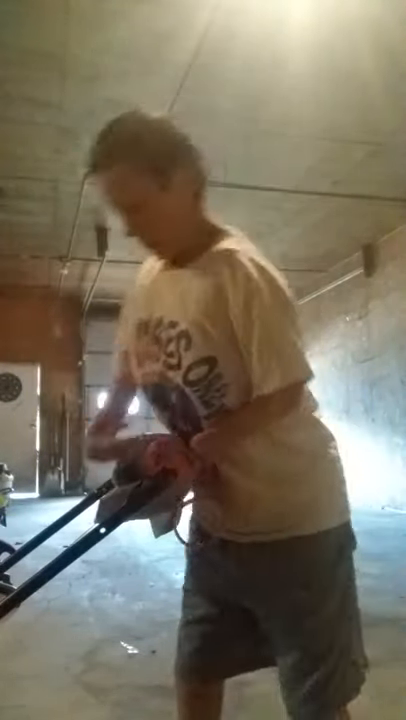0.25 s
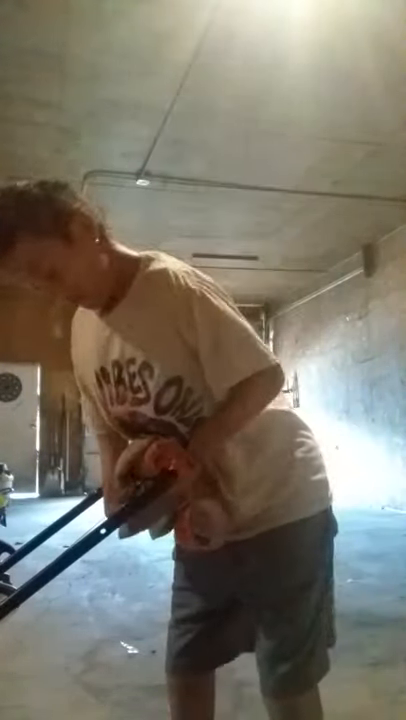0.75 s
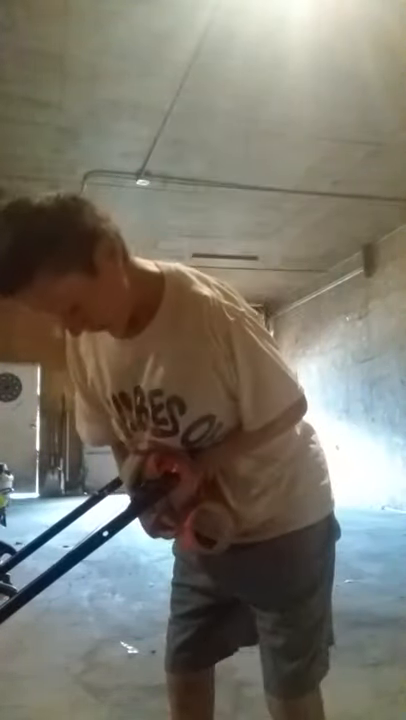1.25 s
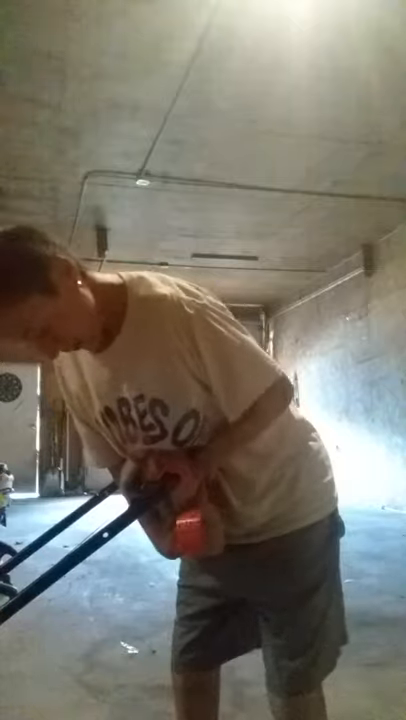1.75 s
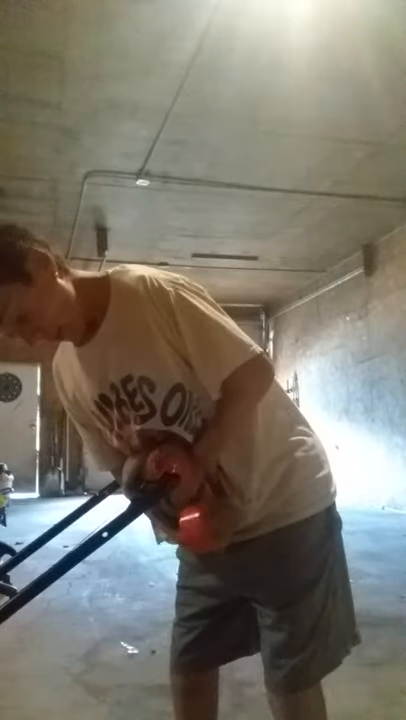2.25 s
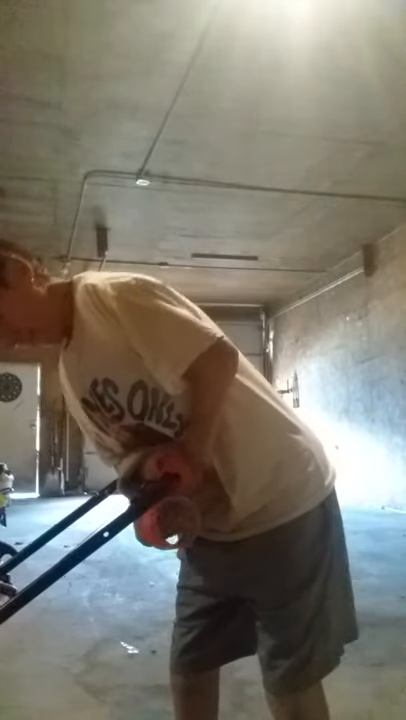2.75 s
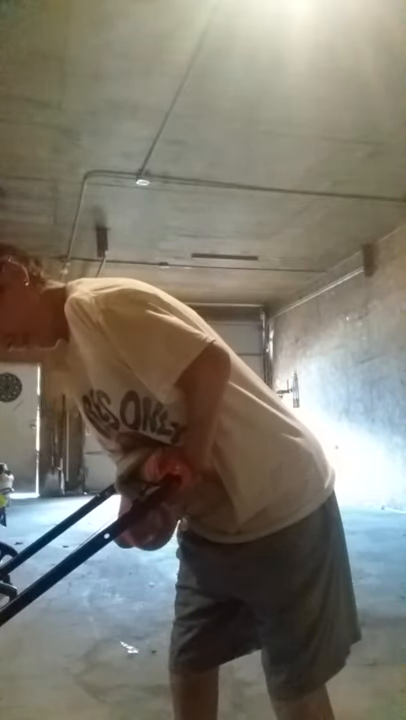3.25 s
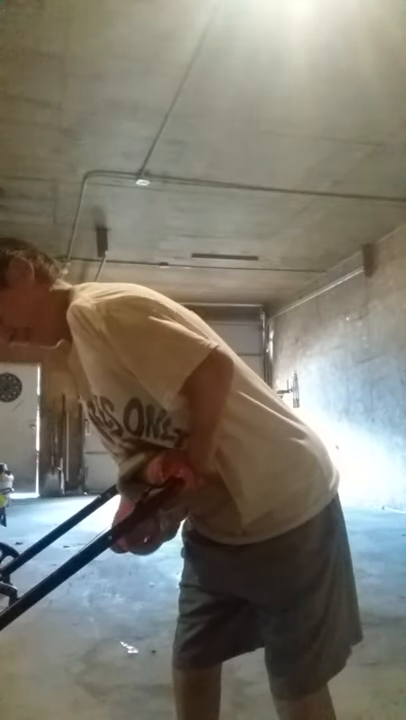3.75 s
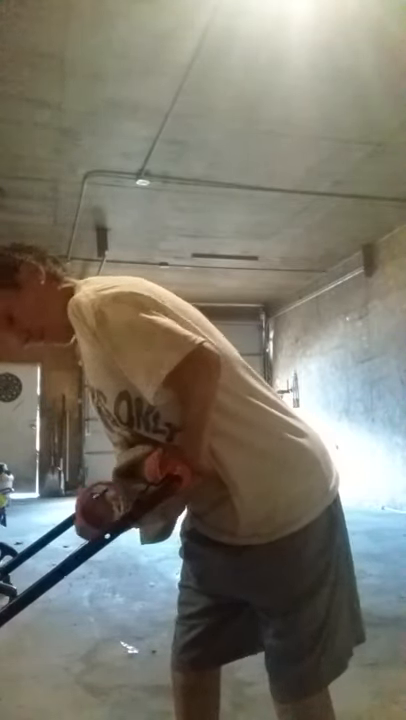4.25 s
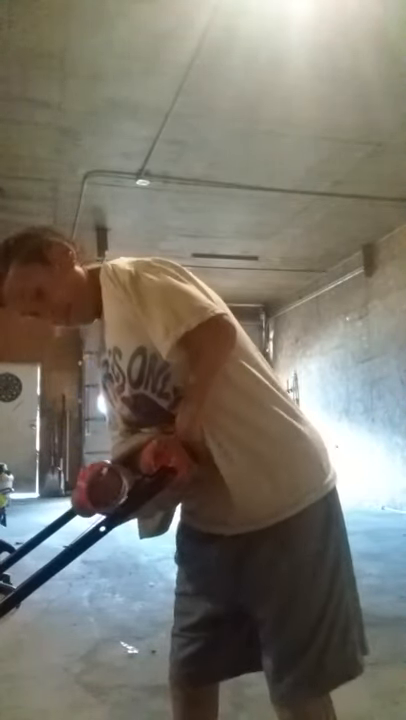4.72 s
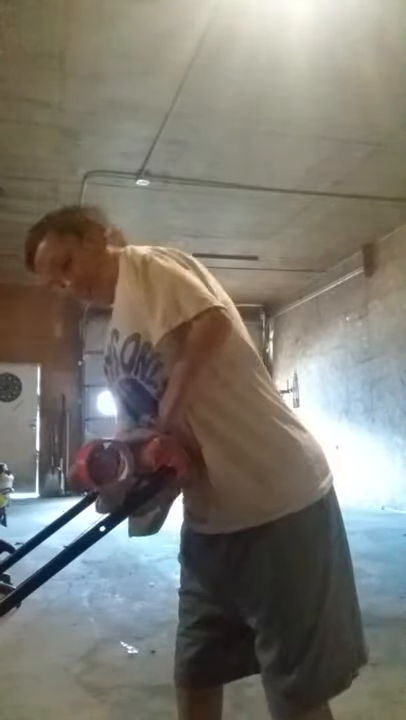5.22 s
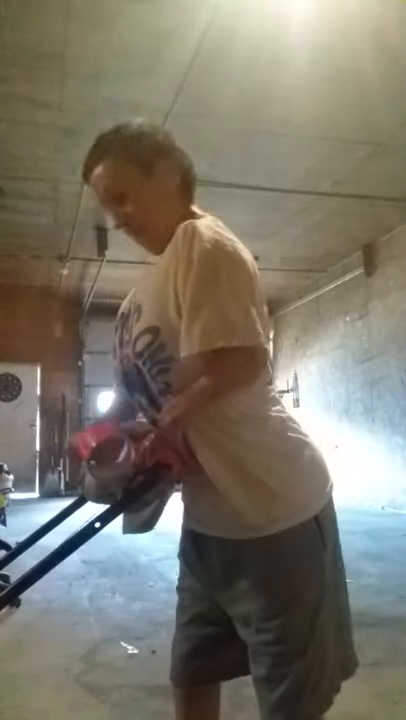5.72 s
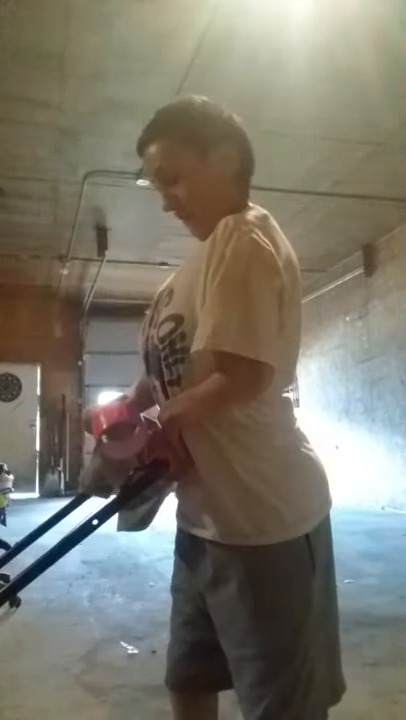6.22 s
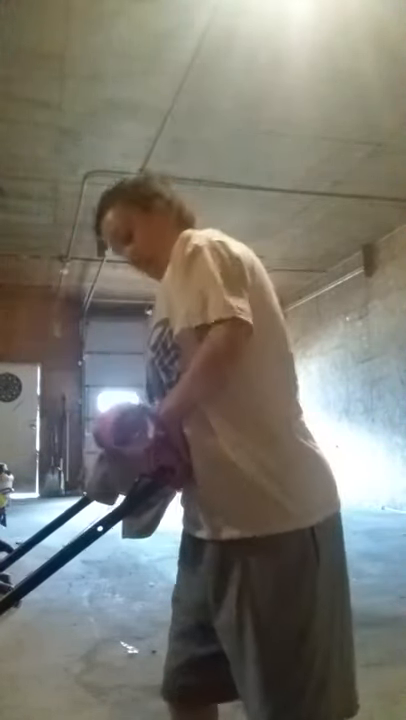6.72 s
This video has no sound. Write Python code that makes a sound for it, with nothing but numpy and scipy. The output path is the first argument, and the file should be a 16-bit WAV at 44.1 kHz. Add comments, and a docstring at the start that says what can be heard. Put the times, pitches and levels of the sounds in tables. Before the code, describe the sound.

Soft handling rustle, then brief sharp rips of sticky tape being wound around a tool handle in a bare concrete room.

```python
"""Duct tape is pulled off the roll in nine short rips and wound round a tool handle in a concrete garage.
Each rip is a run of stick-slip jerks: glue threads snap in clusters and ring the taut strip and the
cardboard roll. Between rips, hands and clothes rustle, the tape ticks and the roll bumps the handle.
A pair of microphones close to the hands hears the bare walls ring behind them, over a low hum."""
import sys
import numpy as np
from scipy import signal
from scipy.fft import rfft, irfft, next_fast_len
from scipy.io import wavfile
from scipy.ndimage import uniform_filter1d

SR = 44100
rng = np.random.default_rng(int(sys.argv[2]) if len(sys.argv) > 2 else 0)


def transcribe(signal):
    """Save signal, clipped to [-1, 1], as a 16-bit WAV file at the path in sys.argv[1]."""
    frames = np.atleast_2d(signal).T
    limited = np.clip(frames, -1, 1)
    pcm = np.round(limited * 32767).astype(np.int16)
    wavfile.write(sys.argv[1], SR, pcm)


N = 307818
TAPS = 4096
HZ = np.fft.rfftfreq(TAPS, 1 / SR)

# One row a rip, each with its own free strip: start_s, length_s, jerk_gap_s, level_db, swell_db,
# tilt_db_per_octave, shade_db, roll_db, low_mode_hz, low_mode_db, high_mode_hz, high_mode_db
RIPS = [(2.9564, 0.041, 0.0075, -12, 1.5, -0.5, 3, -5, 646, 0.5, 1690, -0.5),
        (3.342, .016, .0155, -7.5, -8, 0.2, 1, 1, 692, 9, 2590, 6),
        (3.675, 0.011, 0.0082, -10, -2, -1, 2, -1.5, 698, 12, 2550, 5.5),
        (3.843, 0.027, 0.0078, -10, 3, -0.5, 1.5, 2.5, 805, 0.5, 1120, 7.5),
        (4.1269, 0.036, .0068, -6.5, 0, -1.1, 1.5, -1, 737, 8.5, 1300, 9.5),
        (5.8185, 0.014, 0.0071, -10, -2.5, -1.05, -2, -4, 777, 2.5, 3180, 7.5),
        (6.643, 0.018, .0055, -9, -7, 1.26, 0.5, 2.5, 660, 11, 1300, 10),
        (6.837, 0.014, .015, -9.5, -8.5, -0.2, 3, -3, 710, 0, 3080, -4),
        (6.866, 0.013, 0.0069, -6.5, -6, .5, 3.5, 1.5, 710, 1.5, 3300, 3.5)]
# Resonances of the cardboard roll: pitch_hz, width_hz, boost_db
ROLL_MODES = [(257.8, 47, 6.5), (378.7, 79, 9.5)]


def amp(db):
    """Decibels to gain."""
    return 10 ** (np.asarray(db) / 20)


def unit_rms(x):
    """Scales to an rms of one."""
    return x / np.sqrt(np.mean(x ** 2) + 1e-20)


def curve(points, hz):
    """Interpolates a table on a log-frequency axis."""
    point_hz, value = np.transpose(points)
    return np.interp(np.log(hz + 1), np.log(point_hz + 1), value)


def add(mix, start_s, sound):
    """Mixes a sound in at its start time."""
    part = mix[max(round(start_s * SR), 0):][:len(sound)]
    part += sound[:len(part)]


def resonance(hz, width_hz):
    """Shape of one resonance, 1 at its top."""
    return 1 / (1 + (2 * (HZ - hz) / width_hz) ** 2)


def ring(x, colour_db):
    """Sends x through a minimum-phase response of unit energy with the given spectrum."""
    log_gain = np.log(amp(np.maximum(colour_db - colour_db.max(), -90)))
    mirrored = np.r_[log_gain, log_gain[-2:0:-1]]
    response = np.fft.ifft(np.exp(signal.hilbert(mirrored).conj())).real
    return signal.fftconvolve(x, response / np.linalg.norm(response))


def snaps(size, per_s, spread_db):
    """Random clicks of uneven strength."""
    chance, height, sign = rng.random((3, size))
    return (chance < per_s / SR) * amp(spread_db * height) * np.sign(sign - .5)


def flatten(x, bins):
    """Evens the broad spectrum of a cluster of clicks, keeping its fine grain."""
    spectrum = rfft(x, TAPS)
    return irfft(spectrum / np.sqrt(uniform_filter1d(abs(spectrum) ** 2, bins) + 1e-12))[:len(x)]


def wander(t, length_s, step_s):
    """A random line that takes a new turn at every step."""
    knots = np.arange(0, length_s, step_s)
    return np.interp(t, knots, rng.standard_normal(len(knots)))


def mic_pair(x):
    """Two unrelated signals become what two neighbouring microphones hear: alike in the bass."""
    # Likeness of left and right: frequency_hz, coherence
    likeness = [(60, 0.69), (290, 0.97), (640, 0.81), (1400, -0.24), (3000, 0.03), (16000, 0)]
    common, separate = rfft(x)
    same = np.clip(curve(likeness, np.fft.rfftfreq(x.shape[1], 1 / SR)), -1, 1)
    return irfft([same * common + np.sqrt(1 - same ** 2) * separate, common], x.shape[1])


def room_tone(level_db=-68.5):
    """Low rumble and faint hiss all round the microphones."""
    # Spectrum of the garage air: frequency_hz, density_db
    air = [(15, -55), (25, -26.5), (47, -16.5), (70, -6.5), (120, -11), (137, -20.5), (277, -29),
           (384, -24), (516, -36.5), (695, -27), (1040, -35.5), (1190, -30.5), (3080, -37.5),
           (11000, -35.5), (16000, -40.5)]
    noise = mic_pair(rng.standard_normal((2, N)))
    colour = amp(curve(air, np.fft.rfftfreq(N, 1 / SR)))
    return amp(level_db) * unit_rms(irfft(rfft(noise) * colour, N))


def hum(trim_db=-3, waver_rad=4.3):
    """Two low tones waver slowly, the same in both microphones."""
    # Tones of the hum: pitch_hz, level_db
    tones = [(75.4, -74), (113.0, -78.5)]
    t, out = np.arange(N) / SR, np.zeros(N)
    for hz, db in tones:
        phase = 2 * np.pi * hz * t + waver_rad * wander(t, t[-1] + 1, step_s=.2)
        out += amp(db + trim_db) * np.sqrt(2) * np.sin(phase)
    return out


def garage(x, gap_s=.006, build_s=.035):
    """The long tail of bare concrete walls: it builds up, then dies fastest in the treble."""
    # Reverberation time: frequency_hz, t60_s
    decay = [(100, .85), (350, 0.58), (700, 0.81), (1400, 0.89), (3000, 0.73), (6000, 0.74), (11000, 0.53),
             (16000, .33)]
    # Colour of the tail: frequency_hz, level_db
    colour = [(100, 0), (250, 4), (370, -7), (500, 3.5), (700, -2), (1400, 0), (3000, -1.5), (7000, -4),
              (11000, -4), (15000, -3.5)]
    hz, frame_s, noise = signal.stft(rng.standard_normal((2, SR)), SR, nperseg=512)
    fall_per_s = np.log(1000) / curve(decay, hz)[:, None]
    envelope = np.exp(-fall_per_s * frame_s) * np.sqrt(2 * fall_per_s / SR)
    tail = signal.istft(noise * amp(curve(colour, hz))[:, None] * envelope, SR, nperseg=512)[1]
    onset = np.clip((np.arange(SR) / SR - gap_s) / build_s, 0, 1)
    return signal.fftconvolve(x[None], mic_pair(tail[:, :SR] * onset), axes=1)[:, :N]


def nearby(x, gain_db=1.5, hands_db=-1, hands_s=.0015, floor_db=-7, floor_s=.012):
    """Direct sound, scattered at once by hands and handle, then by floor and walls close by."""
    t = np.arange(TAPS // 2) / SR
    scatter = sum(amp(db) * np.exp(-t / decay_s) / np.sqrt(decay_s * SR / 2)
                  for db, decay_s in [(hands_db, hands_s), (floor_db, floor_s)])
    response = mic_pair(rng.choice([-1., 1.], (2, len(t))) * scatter)
    response[1, 0] += .7  # the right microphone is reached first
    response[0, 3] += .7
    response = np.array([flatten(side, bins=15) for side in response])
    return amp(gain_db) * signal.oaconvolve(x[None], response, axes=1)[:, :N]


def moving(x, space, turn_s, count=4):
    """A moving source meets changing reflections: one set fades into the next."""
    place = np.arange(N) / SR / turn_s
    fades = (np.sin(np.pi / 2 * np.minimum((place + k) % count, 2)) for k in range(count))
    return sum(space(fade * x) for fade in fades)


def stroke(length_s, rise_share):
    """Pressure of a hand movement: it swells for a share of its length, then fades."""
    return np.interp(np.linspace(0, 1, int(length_s * SR)), [0, rise_share, 1], [0, 1, 0])


def rubs_and_bumps(trim_db=-1, peak_db=27, roll_share=.87, bass_cut_db=8):
    """Friction grains with one broad resonance: rubs swell, bumps start at once; the roll rings along."""
    # Hands and tape rubbing the handle: start_s, length_s, level_db, centre_hz, width_octaves
    rubs = [(.04, 0.16, -54.5, 805, .85), (.26, .14, -60, 1150, 0.88), (.31, .18, -58.5, 2110, .6),
            (.495, .14, -57, 544, 0.79), (.91, 0.12, -63.5, 1600, 0.41), (.935, .08, -72, 385, .55),
            (1.04, .17, -76, 1680, 0.2), (5.61, .27, -62, 1250, .5), (6.11, 0.31, -60, 874, 0.87),
            (6.323, .23, -53, 960, 1.27)]
    # The roll landing and scuffing on the handle: start_s, length_s, level_db, centre_hz, width_octaves
    bumps = [(.018, .15, -57, 400, 1.56), (1.555, .06, -56.5, 330, .55), (2.25, .05, -78, 1110, 0.73),
             (2.803, 0.12, -59, 328, 1.2), (4.864, .14, -66.5, 590, 0.67), (5.358, .14, -67, 800, 0.83),
             (5.56, .07, -61.5, 520, 1.0)]
    out = np.zeros(N)
    roll = roll_share * sum(db * resonance(hz, width) for hz, width, db in ROLL_MODES)
    roll -= bass_cut_db * resonance(150, 130)
    for strokes, rise_share in (rubs, .38), (bumps, .03):
        for start_s, length_s, db, hz, width in strokes:
            pressure = stroke(length_s, rise_share)
            grains = unit_rms(snaps(len(pressure), per_s=2200, spread_db=18.5) * pressure)
            widths_away = np.log2((HZ + 1) / hz) / width
            colour = peak_db * np.exp(-widths_away ** 2 / 7) - 1.8 * abs(widths_away) + roll
            add(out, start_s, amp(db + trim_db) * ring(grains, colour))
    return out


def rustle(trim_db=-2, tick_trim_db=6, clump_db=3, fullness=.56):
    """Cloth and loose tape crackle in clumps as the hands move; sticky tape gives a few single ticks."""
    # Strokes of cloth and tape: start_s, length_s, level_db, tilt_db_per_octave, rise_share
    strokes = [(.03, .21, -56, -.5, 0.47), (.275, 0.24, -55.5, -0.5, 0.17), (0.459, .18, -57.5, -1.5, 0.84),
               (0.623, 0.22, -65, -1, .3), (.8, 0.099, -62, 0, 0.24), (1.054, .07, -63.5, -2.5, 0.37),
               (2.601, 0.22, -62.5, -1, 0.52), (2.769, 0.2, -58.5, -1, 0.69),
               (5.104, .07, -65.5, 5.5, 0.34), (5.15, .16, -67.5, -0.5, .15), (5.647, .06, -63.5, 2.5, .5),
               (5.733, 0.094, -69, 4, 0.83), (6.052, 0.27, -59.5, -0.5, 0.63), (6.299, .22, -58, -0.5, 0.2),
               (6.544, 0.1, -54, 0.5, .6)]
    # Spectrum of the crackle: frequency_hz, density_db
    crackle = [(500, -17), (1200, -7), (2700, -6.5), (4500, -7), (7300, -3), (9000, -23), (12000, -16.5),
               (16000, -32)]
    # Ticks of sticky tape: start_s, level_db
    ticks = [(0.365, -35.5), (0.83, -62), (1.494, -48), (2.208, -58), (2.604, -46.5), (2.899, -50),
             (2.945, -32), (3.272, -33), (3.322, -29), (5.309, -42), (6.294, -34), (6.339, -32.5),
             (6.57, -37)]
    out, colour = np.zeros(N), curve(crackle, HZ)
    octaves = np.log2(np.clip(HZ, 500, 8000))
    for start_s, length_s, db, tilt, rise_share in strokes:
        pressure = stroke(length_s, rise_share) ** fullness
        t = np.arange(len(pressure)) / SR
        clumps = amp(clump_db * wander(t, length_s, step_s=.007))
        grains = unit_rms(snaps(len(t), per_s=3700, spread_db=24.5) * clumps * pressure)
        add(out, start_s, amp(db + trim_db) * ring(grains, colour + tilt * octaves))
    for start_s, db in ticks:
        add(out, start_s, amp(db + tick_trim_db) * ring(slip(length_s=.0015), colour))
    return out


def fizz(decay_s=.018):
    """The finest glue threads go on parting for a moment after a jerk."""
    # Spectrum of the finest threads: frequency_hz, density_db
    colour = [(1000, -17), (3000, -4), (7300, 1), (9000, -11.5), (11800, -8.5), (16000, -20)]
    t = np.arange(TAPS // 2) / SR
    threads = snaps(len(t), per_s=6500, spread_db=11.5) * np.exp(-t / decay_s)
    return ring(threads / np.linalg.norm(threads), curve(colour, HZ))


def slip(length_s, first_snap=.39):
    """One jerk: a sharp break, then glue threads snap in a cluster until the tape sticks again."""
    t = np.arange(TAPS // 4) / SR
    cluster = snaps(len(t), per_s=9000, spread_db=25) * np.exp(-(t / length_s) ** 3)
    cluster /= np.linalg.norm(cluster) + 1e-12
    cluster[0] -= first_snap
    return flatten(cluster, bins=30)


def jerks(length_s, gap_s, swell_db, release_db_per_s=1399, jitter_s=.0004, uneven_db=.62, count=9):
    """Stick and slip at a nearly even pace, dying when the pull ends: delay_s, db, tilt_db_per_octave."""
    late, strong, bright = rng.standard_normal((3, count))
    t = np.arange(count) * gap_s
    db = swell_db * np.minimum(t / length_s, 1) - release_db_per_s * np.maximum(t - length_s, 0)
    db[0] += 1  # the first jerk must free the resting tape
    return zip(t + jitter_s * late * (t > 0), db + uneven_db * strong, .42 * bright)


def tape(slip_trim_db=9, fizz_trim_db=-3, facings=6):
    """Every jerk rings the roll and two modes of the free strip; one track for each way the strip faces."""
    # Spectrum of the peeling glue: frequency_hz, density_db
    peel = [(40, -40), (100, -15.5), (200, -18.5), (260, -11.5), (440, -4), (510, -9.5), (700, -3),
            (1300, -4.5), (2000, -5), (3100, -3.5), (5000, -7.5), (7300, -8.5), (9000, -26.5), (11800, -18),
            (16000, -28)]
    tracks = np.zeros((facings, N))
    octaves = np.log2(np.maximum(HZ, 300) / 1500)
    for n, rip in enumerate(RIPS):
        start_s, length_s, gap_s, db, swell_db, tilt, _, roll_db, low_hz, low_db, high_hz, high_db = rip
        roll = sum((mode_db + roll_db) * resonance(hz, width) for hz, width, mode_db in ROLL_MODES)
        strip = low_db * resonance(low_hz, width_hz=140) + high_db * resonance(high_hz, width_hz=260)
        track = tracks[n % facings]
        for delay_s, jerk_db, jerk_tilt in jerks(length_s, gap_s, swell_db):
            colour = curve(peel, HZ) + roll + strip + (tilt + jerk_tilt) * octaves
            crack = ring(slip(length_s=.0036), colour)
            add(track, start_s + delay_s, amp(db + jerk_db + slip_trim_db) * crack)
            add(track, start_s + delay_s, amp(db + jerk_db + fizz_trim_db) * fizz())
    return tracks


def scene(handling_right_db=-1):
    """The roll circles the handle: the body shades some rips, and the jerks face changing walls."""
    # Balance of the microphones, more treble on the right: frequency_hz, left_minus_right_db
    balance = [(60, 2), (350, 0.5), (700, -6), (1300, -3.5), (4000, -3), (8000, -3), (11500, -11),
               (15000, -5)]
    shade = np.ones(N)
    for start_s, _, _, _, _, _, shade_db, *_ in RIPS:
        shade[round(start_s * SR):] = amp(shade_db)
    hands, tracks = rubs_and_bumps() + rustle(), tape()
    rips = sum(nearby(shade * track) for track in tracks) + moving(tracks.sum(0), garage, turn_s=.014)
    handling = moving(hands, nearby, turn_s=.3) + garage(hands)
    mix = rips + handling * amp([[0], [handling_right_db]])
    size = next_fast_len(N + SR)
    lean_db = curve(balance, np.fft.rfftfreq(size, 1 / SR)) / 2
    at_mics = irfft(rfft(mix, size) * amp([lean_db, -lean_db]), size)[:, :N]
    return at_mics + room_tone() + hum()


def record(dry, edge_hz=16300):
    """The recorder's band limit cuts the highest treble."""
    lowpass = signal.firwin(511, edge_hz, window=("kaiser", 9), fs=SR)
    return signal.oaconvolve(dry, lowpass[None], "same")


dry = scene()
out = record(dry)
transcribe(out)
```